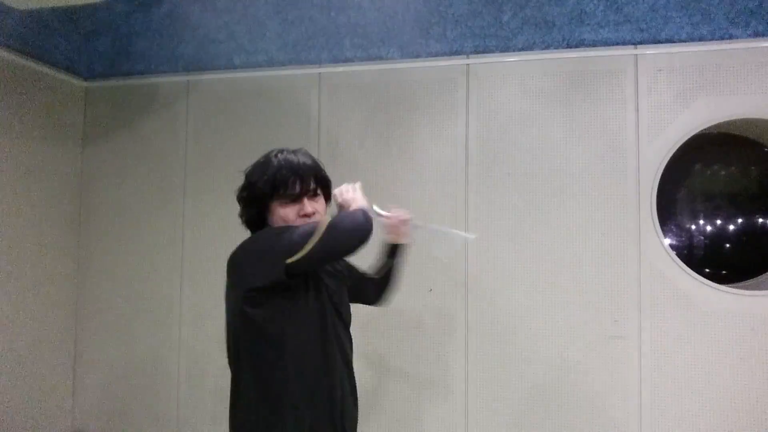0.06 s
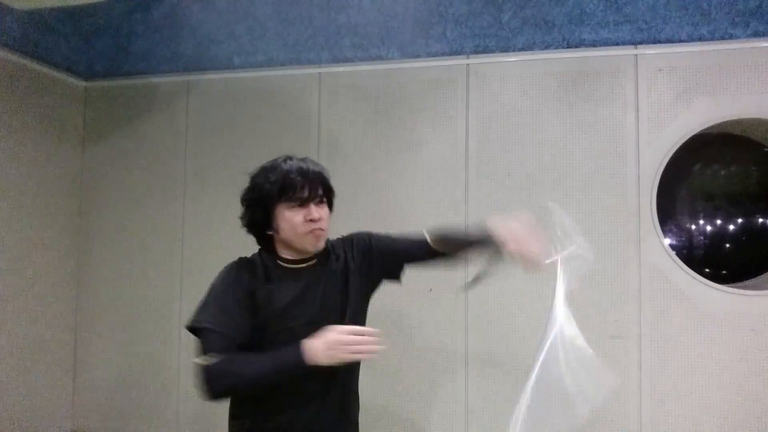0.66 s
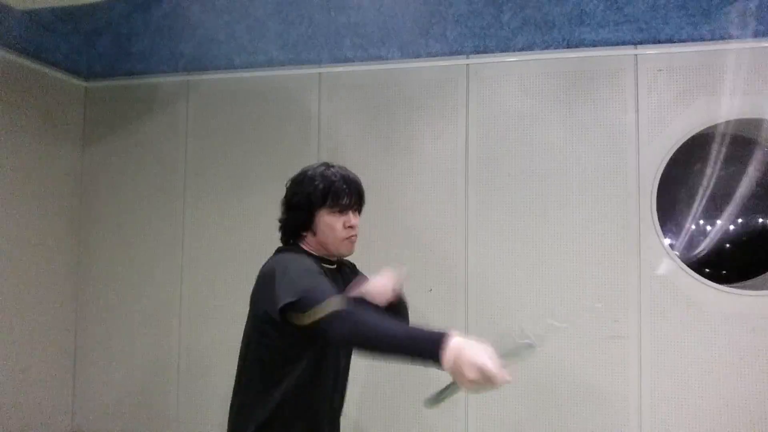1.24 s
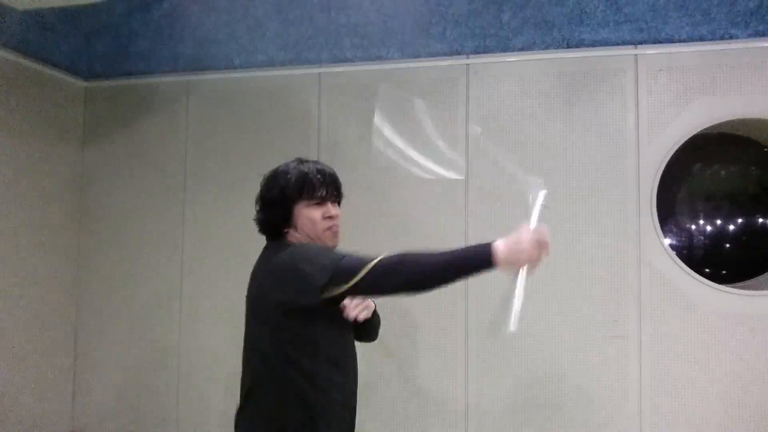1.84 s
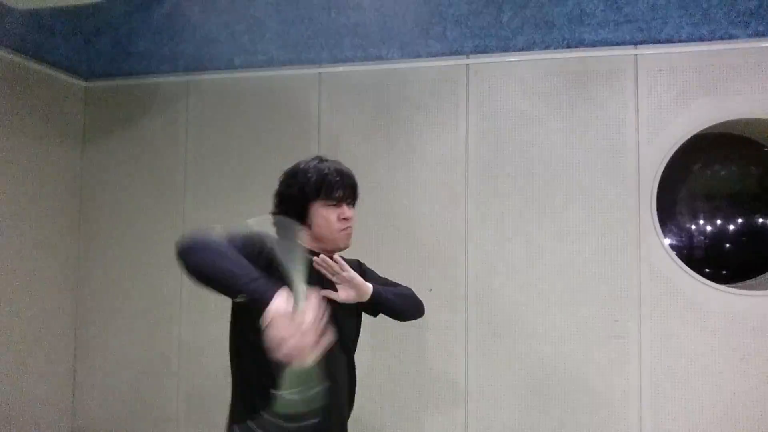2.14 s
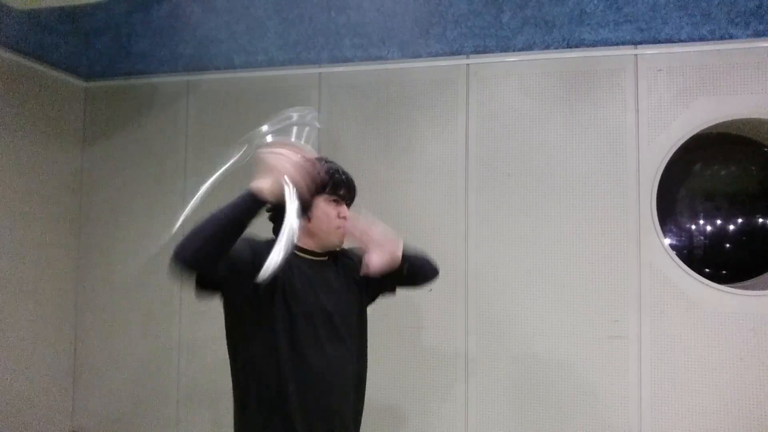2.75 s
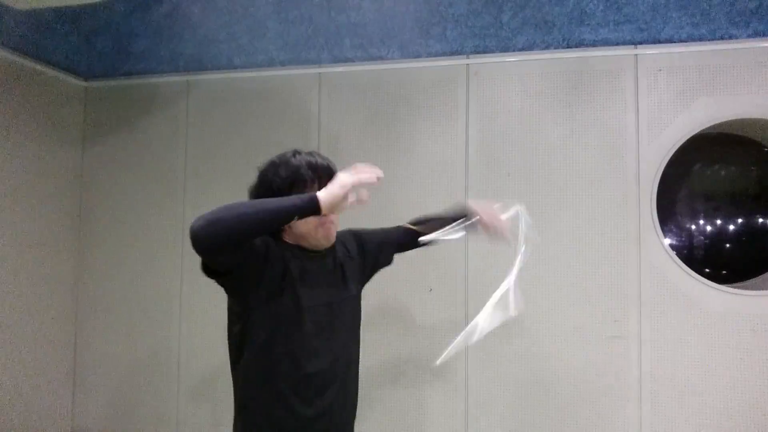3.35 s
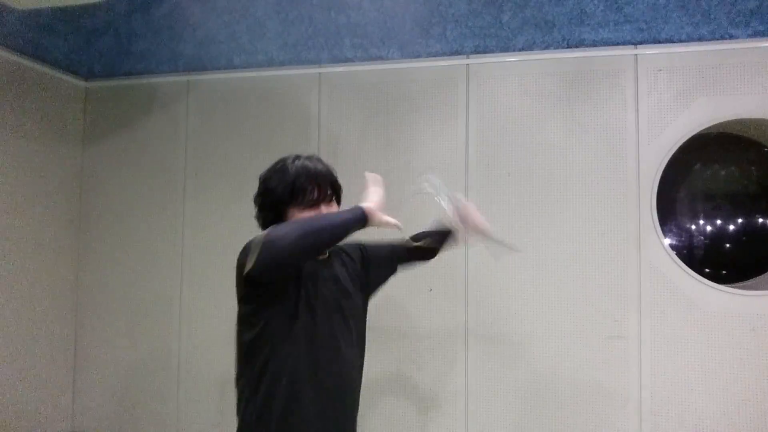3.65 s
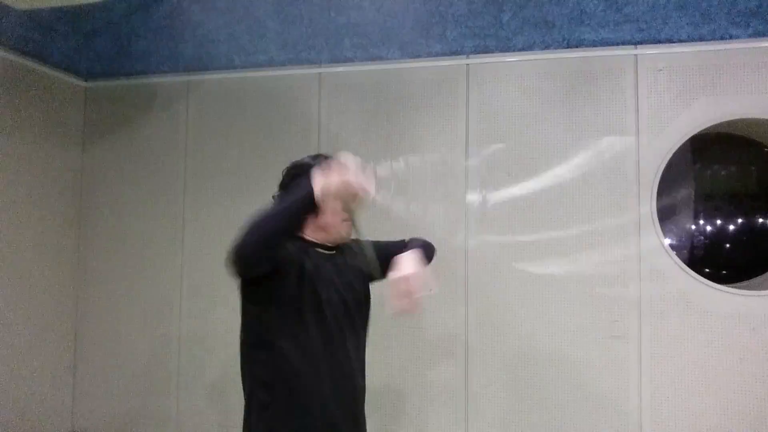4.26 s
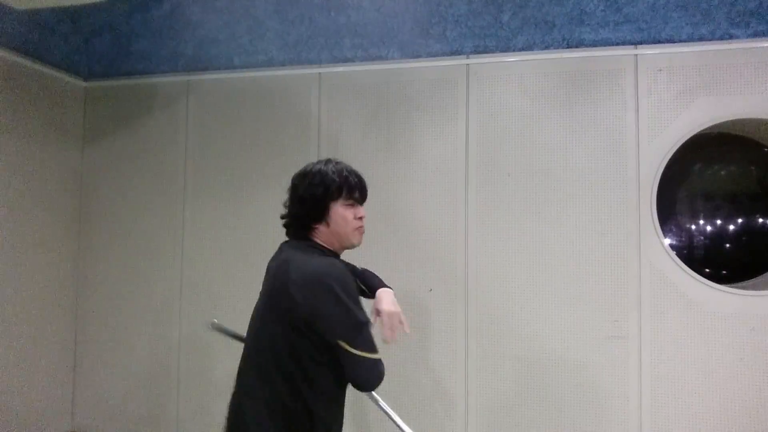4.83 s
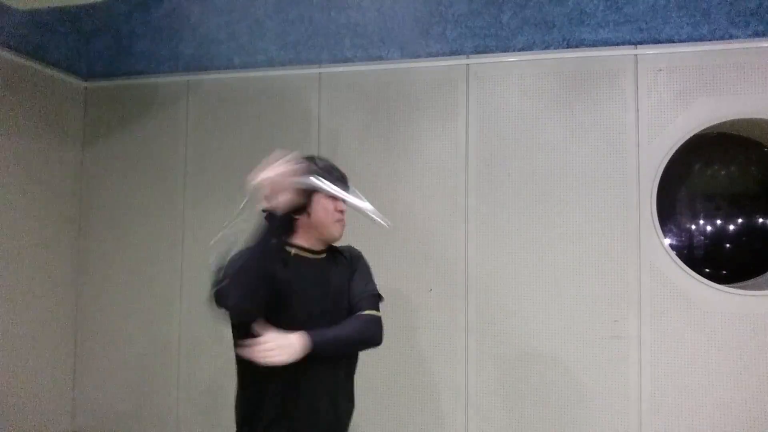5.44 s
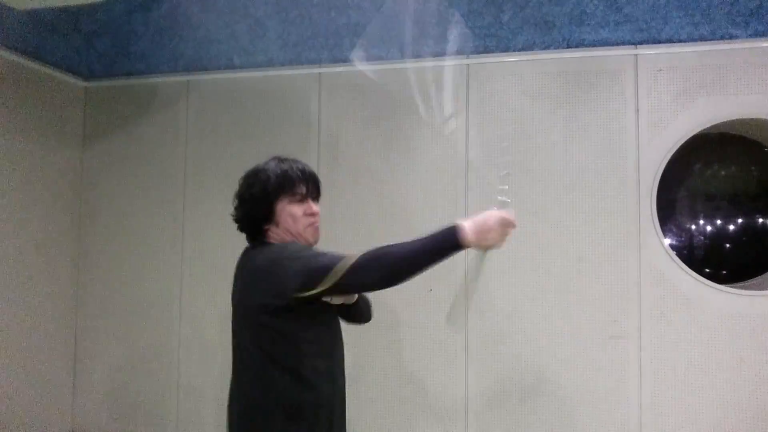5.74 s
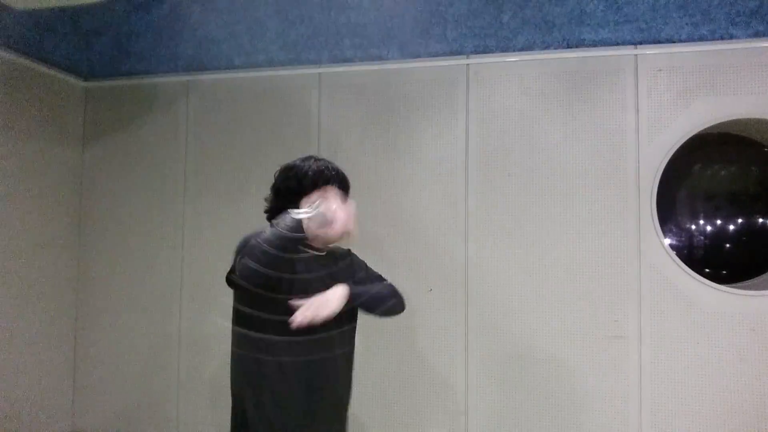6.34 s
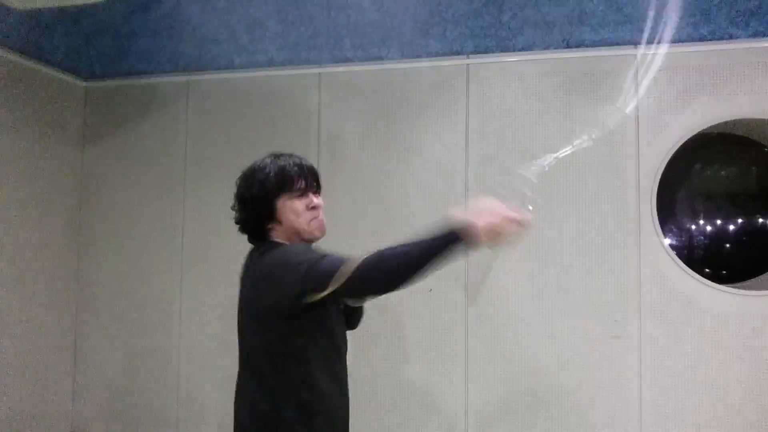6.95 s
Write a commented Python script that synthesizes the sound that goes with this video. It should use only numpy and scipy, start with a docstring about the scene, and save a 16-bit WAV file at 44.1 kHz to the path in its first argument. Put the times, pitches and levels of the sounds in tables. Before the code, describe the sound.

Nunchaku whirl in a bare room, the chain rattling and clinking rapidly with wooden knocks and low whooshes.

```python
"""Nunchaku in a bare, hard-walled room.

Two chained sticks whirl round the body a few metres away. The slack chain rattles, then snaps taut
and clinks at each turn; the jolts ring the sticks' bending modes, Doppler-smeared by their speed.
Under them come low whooshes, short dull thuds and faint low rumbles. Sleeves rustle and sticks slap
palm or arm over room tone."""
import sys
import numpy as np
from scipy import signal
from scipy.fft import rfft, irfft, next_fast_len
from scipy.io import wavfile
from scipy.ndimage import map_coordinates

SR = 44100
rng = np.random.default_rng(int(sys.argv[2]) if len(sys.argv) > 2 else 0)


def store_wav(level_fs):
    """Save 16-bit WAV to argv[1]."""
    pcm = np.round(np.clip(np.atleast_2d(level_fs), -1, 1) * 32767)
    wavfile.write(sys.argv[1], SR, pcm.T.astype(np.int16))


N = 308259
TIME = np.arange(N) / SR

# chain jolts: start_s, link_db, link_t60_s, struck_link_hz, wood_db
JOLTS = [(0.086, -25, 0.03, 8650, -47.5), (0.19, -24.5, 0.012, 9400, -34), (0.199, -21.5, 0.018, 7800, -56),
         (0.226, -24, 0.034, 7770, -44.5), (0.316, -12.5, 0.0056, 7280, -40),
         (0.361, -29, 0.024, 8250, -37.5), (0.461, -19.5, 0.033, 8540, -47), (0.578, -19, 0.021, 9850, -71),
         (0.62, -29, 0.032, 8700, -42.5), (0.646, -22.5, 0.016, 6330, -39),
         (0.734, -22.5, 0.023, 9270, -36.5), (0.76, -20, 0.015, 8970, -47),
         (0.777, -23.5, 0.039, 7200.0, -39.5), (0.864, -24, 0.039, 8480, -53),
         (1.04, -24.5, 0.021, 8640, -44), (1.049, -22, 0.027, 8900, -45.5), (1.16, -35, 0.078, 8900, -45),
         (1.223, -28, 0.018, 9000, -42), (1.321, -31, 0.0027, 7850, -40), (1.332, -27, 0.0021, 7450, -58),
         (1.354, -17.5, 0.0092, 9100, -35), (1.429, -23, 0.0055, 8300, -29.5),
         (1.459, -15, 0.011, 7530, -37), (1.48, -23.0, 0.022, 8500, -51), (1.504, -26, 0.014, 8200, -35.5),
         (1.63, -26.5, 0.017, 9400, -36.5), (1.745, -50, 0.059, 8400, -47.5),
         (1.841, -30, 0.04, 9660, -43.5), (1.931, -28.5, 0.017, 7530, -35.5),
         (1.984, -38, 0.02, 8000, -42.5), (2.032, -19, 0.021, 7030, -38.5),
         (2.063, -16, 0.028, 9630, -34.5), (2.197, -29.5, 0.009, 6750, -37),
         (2.265, -36, 0.0023, 7550.0, -41), (2.328, -26, 0.032, 8500, -39), (2.366, -20, 0.011, 7180, -39),
         (2.43, -19, 0.018, 7080, -45.5), (2.446, -23, 0.0039, 8600, -35.5),
         (2.456, -27.5, 0.022, 8960, -34.5), (2.515, -19, 0.0094, 7670, -29),
         (2.535, -17.5, 0.033, 8800, -49), (2.557, -25, 0.011, 8400, -51), (2.575, -18, 0.024, 8930, -46),
         (2.584, -25, 0.014, 9400, -33.5), (2.597, -25, 0.021, 9200, -67),
         (2.671, -18, 0.0098, 11700, -35.5), (2.797, -34.5, 0.042, 6840, -45),
         (2.86, -31, 0.03, 8340.0, -43), (2.917, -29, 0.022, 9700, -40.5), (2.93, -19, 0.006, 10200, -39.5),
         (2.963, -25, 0.014, 6970, -41.5), (3.079, -36.5, 0.089, 8740, -46),
         (3.191, -23, 0.019, 8520, -33.5), (3.237, -23, 0.0067, 8540, -39),
         (3.352, -19.5, 0.017, 9840, -32), (3.45, -20, 0.021, 8000, -36), (3.494, -28.5, 0.017, 8400, -32),
         (3.578, -25.5, 0.0067, 8400, -38), (3.664, -28.5, 0.034, 9300, -34),
         (3.675, -15, 0.015, 8060, -37), (3.76, -20, 0.024, 8600, -31.5), (3.807, -18.5, 0.016, 6680, -37),
         (3.839, -19.5, 0.035, 9600, -36), (3.932, -23.5, 0.022, 9550, -34),
         (4.004, -30.5, 0.013, 8730, -36.5), (4.081, -28, 0.026, 6630, -47),
         (4.099, -24, 0.0071, 8600, -34), (4.14, -22.5, 0.028, 10400, -65),
         (4.155, -25, 0.0064, 8200, -40.5), (4.193, -25, 0.016, 7000, -42),
         (4.224, -20.5, 0.015, 7860, -30.0), (4.255, -16.5, 0.015, 9160, -40),
         (4.343, -27, 0.034, 8840, -54), (4.371, -27.5, 0.034, 8870, -36), (4.575, -24, 0.022, 8840, -38.5),
         (4.587, -27, 0.015, 8770, -39), (4.628, -21.5, 0.0057, 6740, -43),
         (4.685, -21, 0.019, 7830, -35.5), (4.714, -25, 0.0068, 8800, -30), (4.75, -25.5, 0.031, 8150, -41),
         (4.777, -19.5, 0.013, 6700, -31.5), (4.885, -21, 0.016, 8860.0, -34.5),
         (5.011, -34, 0.02, 10400, -45), (5.054, -30, 0.029, 8900, -39), (5.115, -30, 0.025, 10000, -40.5),
         (5.202, -26.5, 0.011, 8500, -38), (5.274, -31, 0.11, 8520.0, -41), (5.405, -25, 0.017, 8400, -35),
         (5.463, -23, 0.023, 8860, -30), (5.489, -19, 0.014, 8350, -28.5), (5.5, -19, 0.024, 9070, -45),
         (5.558, -17.5, 0.014, 8930, -42), (5.576, -26, 0.017, 10100, -33),
         (5.681, -20.5, 0.031, 8550, -29), (5.697, -27, 0.022, 8580, -37), (5.759, -28, 0.011, 8700, -34),
         (5.833, -27.5, 0.015, 6800, -38), (5.859, -21.5, 0.016, 8230, -33.5),
         (5.897, -22.5, 0.0044, 8600, -33.5), (5.94, -19.5, 0.016, 8900, -35),
         (5.962, -19.5, 0.028, 7860, -31), (6.008, -20.5, 0.022, 11560, -35.5),
         (6.062, -23.5, 0.028, 7980, -34), (6.169, -21, 0.016, 8700, -38.5),
         (6.2, -34, 0.019, 10000, -34.5), (6.263, -26.5, 0.011, 11900, -41),
         (6.284, -31.5, 0.038, 9050.0, -42), (6.335, -16.5, 0.017, 9700, -33),
         (6.361, -39, 0.011, 8380.0, -33), (6.397, -29, 0.014, 8800, -32.5),
         (6.407, -14.5, 0.011, 8200, -38.5), (6.429, -20.5, 0.021, 7730, -57),
         (6.487, -19, 0.018, 11300, -40.5), (6.663, -22, 0.022, 8800, -40.5),
         (6.721, -27.5, 0.019, 9050, -41.5), (6.857, -29, 0.023, 8900, -41.5),
         (6.888, -27.5, 0.025, 11100, -37.0)]
# low whooshes, short dull thuds and faint low rumbles: centre_s, level_db, pitch_hz
LOW_SWELLS = [(0.17, -44.5, 148), (0.333, -32, 191), (0.369, -36.5, 169.7), (0.618, -39, 162),
              (1.33, -37, 153), (1.372, -42, 160.3), (1.497, -34.5, 176.3), (1.799, -40, 141.8),
              (2.037, -39, 135.6), (2.13, -45, 162.8), (2.188, -33, 179.5), (2.44, -36.5, 143.3),
              (2.557, -52, 166), (2.612, -39.5, 158.5), (2.656, -48, 165.8), (2.954, -36.5, 150),
              (3.311, -41.5, 155), (3.58, -42.5, 126.6), (3.8, -49, 94.7), (4.2, -46.5, 109.6),
              (4.268, -33.5, 145.6), (4.717, -33, 154), (4.748, -31, 198.6), (4.805, -36.5, 189.3),
              (5.185, -41, 134), (5.338, -30.5, 154), (5.503, -30.5, 219.5), (5.652, -27, 169),
              (5.907, -37, 122), (6.056, -30, 159.3), (6.361, -35.5, 139.8), (6.477, -42, 157.4),
              (6.84, -36.5, 162.6)]
# stick bending modes: pitch_hz, t60_s, shaken_db
STICK_MODES = [(1060, 0.034, -19.5), (3018, 0.016, -8), (5589, 0.025, -8.5), (8860, 0.032, -7)]
# chain link modes: pitch_hz, level_db
LINK_MODES = [(6550, 19.5), (7150, 24.5), (8450, 17), (9500, 18), (10900, 24.5), (12400, 20.5),
              (13900, 8.5)]


def undb(db):
    """Decibels to gain."""
    return 10 ** (np.asarray(db) / 20)


def unit_rms(x):
    """Scale to rms 1."""
    return x / np.sqrt(np.mean(x ** 2) + 1e-20)


def unit_hit(x):
    """Scale to the energy of 10 ms at rms 1."""
    return x / np.sqrt(np.sum(x ** 2) / (SR / 100) + 1e-20)


def fade(t, t60_s):
    """Exponential decay from t = 0."""
    return np.exp(-np.log(1000) * np.maximum(t, 0) / max(t60_s, 1e-3)) * (t >= 0)


def interp_log(hz, points):
    """Interpolate (freq_hz, value) points over log frequency."""
    freq_hz, value = np.transpose(points)
    return np.interp(np.log(hz + 1e-9), np.log(freq_hz), value)


def colour(x, points):
    """Minimum-phase filter through (freq_hz, gain_db) points."""
    size = next_fast_len(2 * x.shape[-1] + 2) * 2
    hz = np.arange(size // 2 + 1) * SR / size
    cepstrum = irfft(np.log(undb(interp_log(hz, points))))
    cepstrum[1:size // 2] *= 2
    cepstrum[size // 2 + 1:] = 0
    return irfft(rfft(x, size) * np.exp(rfft(cepstrum)))[..., :x.shape[-1]]


def add(track, start_s, x):
    """Mix x into track at start_s."""
    i = max(int(round(start_s * SR)), 0)
    track[..., i:i + x.shape[-1]] += x[..., :max(N - i, 0)]


def wander(size, rate_hz):
    """Linearly interpolated noise, rms about 1.4."""
    hop = max(int(SR / rate_hz), 2)
    steps = rng.standard_normal(size // hop + 3)
    return map_coordinates(steps, [np.arange(size) / hop + rng.random()], order=1) * 1.69


def burst(t, t60_s, spectrum):
    """Impact: decaying, coloured noise."""
    return unit_hit(colour(rng.standard_normal(len(t)) * fade(t, t60_s), spectrum))


def ring(t, hz, t60_s, doppler, whirl_hz=5):
    """One mode of a moving part; pitch follows its speed towards the listener."""
    angle = 2 * np.pi * (whirl_hz * t + rng.random())
    pitch_hz = hz * (1 + doppler * rng.uniform(0.76, 1) * np.sin(angle))
    attack = 1 - fade(t, 20 / hz)
    return np.sin(2 * np.pi * np.cumsum(pitch_hz) / SR) * fade(t, t60_s) * attack


def room_tone(level_db=-62):
    """Steady low hush, partly common to both sides."""
    # room tone spectrum: freq_hz, density_db
    spectrum = [(30, -21), (115, 6.5), (250, -7), (1600, -17), (15000, -65)]
    noise = rng.standard_normal(N) + rng.standard_normal((2, N))
    return undb(level_db) * unit_rms(colour(noise, spectrum))


def link_clink(t, t60_s, struck_hz, struck_db=-5, scatter_db=4, bounce_db=-6, max_bounce_s=0.0088):
    """Links slide home: neighbours' modes, the struck link's note, a crack, two lighter bounces."""
    # metal-on-metal crack spectrum: freq_hz, density_db
    crack_spectrum = [(1700, -37), (2600, -4), (4400, -7), (6600, 7.5), (9000, 8.5), (14500, -1)]
    neighbours = sum(undb(db + scatter_db * rng.standard_normal()) * ring(t, hz, t60_s, doppler=.07)
                     for hz, db in LINK_MODES)
    note = undb(struck_db) * unit_hit(ring(t, struck_hz, t60_s, doppler=.006))
    crack = burst(t, t60_s, crack_spectrum)
    seat_s = .0004 + .045 * t60_s
    strike = (.7 * unit_hit(neighbours) + note + crack) * (1 - np.exp(-t / seat_s))
    out = strike.copy()
    for late, strength in rng.random((2, 2)):
        lag = int(np.clip(late * max_bounce_s * SR, 1, len(t) // 2))
        out[lag:] += strength * undb(bounce_db) * strike[:-lag]
    return unit_hit(out)


def stick_ring(t, levels_db):
    """Both sticks ring; the free one sweeps its radiation lobes past the listener."""
    out = 0
    for (hz, t60_s, _), db in zip(STICK_MODES, levels_db):
        held = ring(t, hz, t60_s, doppler=.022)
        free = ring(t, hz, t60_s, doppler=.042)
        lobes = np.exp(wander(len(t), rate_hz=90))
        out = out + undb(db) * unit_hit(.5 * held + free * lobes)
    return out


def shaking_db(hold_s=0.1, settle_db_per_s=180, max_settle_db=16):
    """Slack chain level: follows arm effort, is stirred by each jolt, then settles."""
    # arm effort shaking the chain: time_s, level_db
    effort = [(0, -21), (.15, -46), (.4, -28.5), (.85, -44), (1.28, -40.5), (1.5, -43), (1.7, -35),
              (2.25, -41.5), (2.55, -30.5), (2.85, -45), (3.35, -31.5), (3.85, -33.5), (4.38, -40),
              (4.55, -32.5), (5.25, -51.5), (5.65, -30), (6.45, -46.5), (6.99, -35)]
    starts_s = np.sort(np.append(0, np.array(JOLTS)[:, 0]))
    since_s = TIME - starts_s[np.searchsorted(starts_s, TIME, side="right") - 1]
    settled_db = np.clip(settle_db_per_s * (since_s - hold_s), 0, max_settle_db)
    return np.interp(TIME, *np.transpose(effort)) - settled_db


def chain_rattle(gain_db=-5.5, variants=80, clinks_per_s=145, link_t60_s=.016):
    """Dense, uneven clinks of the slack chain; each shakes the stick modes differently."""
    clink_scatter_db, mode_scatter_db = 4.6, 7
    t = np.arange(SR // 16) / SR
    drop_db = mode_scatter_db * rng.exponential(size=(variants, len(STICK_MODES)))
    shaken_db = np.array(STICK_MODES)[:, 2] - drop_db + mode_scatter_db / 3
    low_hz, high_hz = LINK_MODES[0][0], LINK_MODES[-2][0]
    clinks = [link_clink(t, link_t60_s, rng.uniform(low_hz, high_hz)) + stick_ring(t, modes_db)
              for modes_db in shaken_db]
    out = np.zeros((2, N))
    for k, (late, size, pick, pan) in enumerate(rng.random((int(clinks_per_s * N / SR), 4))):
        gain = undb(clink_scatter_db * min(-np.log(size), 2))
        sides = np.sqrt([[pan], [1 - pan]])
        add(out, (k + 2 * late) / clinks_per_s, gain * sides * clinks[int(pick * variants)])
    return unit_rms(out) * undb(shaking_db() + gain_db)


def sleeve_rustle(gain_db=-17, width_s=0.064, idle_db=-37):
    """Cloth rustles in patches, louder round each low swell."""
    # sleeve and shirt spectrum: freq_hz, density_db
    spectrum = [(30, -21.5), (90, 6), (250, -5), (520, -24), (1500, -26), (4000, -20)]
    swell_power = sum(undb(db) ** 2 * np.exp(-((TIME - centre_s) / width_s) ** 2)
                      for centre_s, db, _ in LOW_SWELLS)
    envelope = np.sqrt(swell_power + undb(idle_db) ** 2)
    folds = undb(4 * wander(N, rate_hz=25))
    noise = rng.standard_normal(N) + .5 * rng.standard_normal((2, N))
    return undb(gain_db) * envelope * unit_rms(folds * colour(noise, spectrum))


def chain_jolts(link_gain_db=-2.5, stick_gain_db=-2, knock_gain_db=-3, knock_t60_s=0.049):
    """The chain snaps taut: links clink, sticks ring, wood knocks. Returns direct, to_walls."""
    # chain end striking wood: freq_hz, density_db
    knock_spectrum = [(150, 7), (500, 9.5), (750, 4), (1080, 13), (1600, 6), (2600, 20.5), (4500, 14.5),
                      (9000, -12.5)]
    contact_scatter_db, pan_db, pan_scatter_db = 2, -1, 2.5
    slide_db, slide_lead_s, typical_t60_s = -23, .007, .015
    direct, to_walls = np.zeros((2, 2, N))
    t = np.arange(SR // 12) / SR
    for start_s, link_db, t60_s, struck_hz, wood_db in JOLTS:
        # the blow drives the low modes, the links the high ones
        drive_db = np.array([wood_db - 9.5, wood_db, (wood_db + link_db) / 2 - 3, link_db - 7])
        modes_db = drive_db + stick_gain_db + contact_scatter_db * rng.standard_normal(len(drive_db))
        clatter = t60_s / typical_t60_s
        knock_gain = undb(wood_db + knock_gain_db) / clatter ** 0.1  # sudden stops knock harder
        knock = knock_gain * burst(t, knock_t60_s, knock_spectrum)
        link_gain = undb(link_db + link_gain_db)
        # each path has its own Doppler shifts
        near, *far = (link_gain * link_clink(t, t60_s, struck_hz) + stick_ring(t, modes_db) + knock
                      for _ in range(3))
        lag_s = 1e-4 * rng.standard_normal()
        balance_db = pan_db + pan_scatter_db * rng.standard_normal()
        slide_tick = link_gain * undb(slide_db) * link_clink(t, t60_s, struck_hz)
        add(direct, start_s - slide_lead_s, slide_tick)
        spill = clatter ** 0.85  # a short snap is beamed, a long clatter fills the room
        for side, sign in enumerate((1, -1)):
            add(direct[side], start_s + sign * lag_s / 2, undb(sign * balance_db / 2) * near)
            add(to_walls[side], start_s, spill * far[side])
    return np.array([direct, to_walls])


def low_swells(tone_db=-2, noise_db=-13, droop=.16, waver=.055):
    """Low whooshes, short dull thuds and faint rumbles: a wavering tone swells and falls in noise."""
    # dull noise under each swell: freq_hz, density_db
    spectrum = [(30, -7.5), (80, -5), (200, 3.5), (330, -3), (520, -2.5), (800, -15), (2000, -27.5)]
    ref_width_s, ref_hz = 0.023, 149.3
    tones, envelope = np.zeros((2, N))
    t = np.arange(-SR // 8, SR // 8) / SR
    for centre_s, db, hz in LOW_SWELLS:
        width_s = ref_width_s * (ref_hz / hz) ** 2.65  # higher is briefer
        swell = np.exp(-(t / width_s) ** 2 / 2)
        pitch_hz = hz * (1 + droop * (swell - .75) + waver * wander(len(t), rate_hz=77.2))
        tone = np.sqrt(2) * np.sin(2 * np.pi * np.cumsum(pitch_hz) / SR)
        add(tones, centre_s + t[0], undb(db) * swell * tone)
        add(envelope, centre_s + t[0], undb(db) * swell)
    noise = envelope * unit_rms(colour(rng.standard_normal(N), spectrum))
    return undb(tone_db) * tones + undb(noise_db) * noise


def pings(hold_s=.017, damping_t60_s=.04, spill_db=-5):
    """A tapped, loosely held stick or link sings on one gliding mode. Returns direct, to_walls."""
    # clean taps: start_s, pitch_hz, level_db
    taps = [(0.395, 1043, -45), (0.738, 5780, -31), (0.866, 5580, -27.5), (1.22, 2910, -38),
            (1.355, 5640, -31), (1.367, 8760, -21), (1.851, 2975, -31.5), (2.056, 3000, -23.5),
            (2.061, 5600, -22.5), (2.366, 5680, -33.5), (2.58, 2950, -26.5), (2.6, 5465, -19.5),
            (3.024, 3010, -37.5), (3.236, 2990, -30), (3.837, 5590, -23.5), (3.862, 1092, -41),
            (3.901, 2990, -24), (4.223, 3130, -29.5), (4.254, 3070, -32.5), (4.476, 5560, -36),
            (4.543, 3000, -32), (4.706, 1056, -37), (4.745, 5500, -34), (4.911, 1095, -43),
            (5.105, 3123, -35), (5.206, 5330, -33.5), (5.462, 5570, -28), (5.58, 3094, -29.5),
            (5.644, 1030, -43), (5.685, 5770, -25.5), (6.011, 2960, -23.5), (6.29, 3050, -38),
            (6.342, 3010, -31.5), (6.405, 5460, -28.5), (6.72, 5470, -31.5)]
    direct = np.zeros((2, N))
    t = np.arange(SR // 10) / SR
    damping = fade(np.maximum(t - hold_s, 0), damping_t60_s)
    for start_s, hz, db in taps:
        add(direct, start_s, undb(db) * unit_hit(ring(t, hz, 0.35, doppler=.012) * damping))
    return np.array([direct, undb(spill_db) * direct])


def slaps(gain_db=-2, t60_s=0.058):
    """Dull pats as a stick is caught or rebounds from the arm."""
    # hits on palm or arm: start_s, level_db
    hits = [(0.446, -45), (0.79, -41.5), (1.04, -38), (1.636, -41), (2.053, -51), (2.329, -40),
            (4.343, -40), (5.835, -38), (5.934, -32), (6.227, -35.5)]
    # wood-on-flesh spectrum: freq_hz, density_db
    spectrum = [(150, -3), (550, -6.5), (1100, 1), (2000, -16.5)]
    out = np.zeros(N)
    t = np.arange(SR // 10) / SR
    for start_s, db in hits:
        add(out, start_s, undb(db + gain_db) * burst(t, t60_s, spectrum))
    return out


def room(x, gap_s=0.0028, build_s=0.0035, lumpiness=0.47, coherent_hz=330):
    """Hard walls: lumpy early echoes melt into a tail, alike on both sides in the bass."""
    # reverberation times: freq_hz, t60_s
    bands = [(120, 0.88), (3000, 0.49), (7000, 0.28), (14000, 0.18)]
    t = np.arange(SR * 2 // 3) / SR
    hz = np.arange(len(t) // 2 + 1) * SR / len(t)
    mid, side = rfft(rng.standard_normal((2, len(t))))
    width = hz / np.hypot(hz, coherent_hz)
    field = (mid + np.array([[1], [-1]]) * width * side) / np.sqrt(1 + width ** 2)
    tail = 0
    for band_hz, t60_s in bands:
        share = interp_log(hz, [(freq_hz, freq_hz == band_hz) for freq_hz, _ in bands])
        tail = tail + irfft(field * share, len(t)) * fade(t, t60_s)
    onset = np.clip((t - gap_s) / build_s, 0, 1)
    lumps = np.exp(lumpiness * wander(len(t), rate_hz=500) * fade(t, t60_s=0.49))
    tail *= onset * lumps
    tail /= np.sqrt(np.sum(tail ** 2, axis=1, keepdims=True))
    return signal.fftconvolve(x, tail, axes=1)


def moving_echoes(x, block_s=.4):
    """The sticks travel round the body, so each block meets a new echo pattern."""
    block = int(block_s * SR)
    out = np.zeros((2, N))
    for i in range(0, N, block):
        add(out, i / SR, room(x[:, i:i + block]))
    return out


def scene(hit_send_db=-2, rattle_send_db=-1, soft_send_db=-9.5):
    """Chain, sticks, low swells, cloth and slaps, direct and off the walls, over room tone."""
    hits, hits_to_walls = chain_jolts() + pings()
    rattle = chain_rattle()
    soft = low_swells() + sleeve_rustle() + slaps()
    send = undb(hit_send_db) * hits_to_walls + undb(rattle_send_db) * rattle + undb(soft_send_db) * soft
    return hits + rattle + soft + moving_echoes(send) + room_tone()


def record(dry, cutoff_hz=14550):
    """Microphone pair, left duller than right, low-passed."""
    # microphone mismatch: freq_hz, left_minus_right_db
    mismatch = [(700, 0), (1290, -1), (2380, -3.3), (4400, -6.5), (8100, -4.8), (15000, -2.5)]
    pair = [colour(x, [(hz, sign * db / 2) for hz, db in mismatch]) for x, sign in zip(dry, (1, -1))]
    lowpass = signal.ellip(8, .2, 65, cutoff_hz, fs=SR, output="sos")
    return signal.sosfilt(lowpass, pair)


dry = scene()
out = record(dry)
store_wav(out)
```